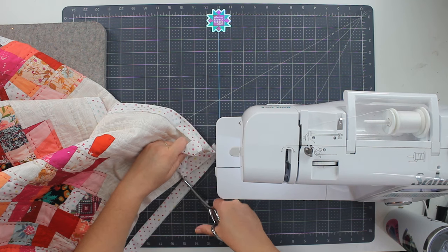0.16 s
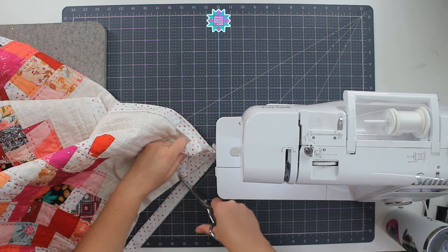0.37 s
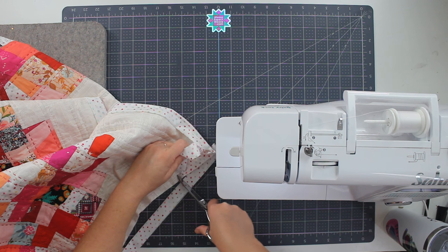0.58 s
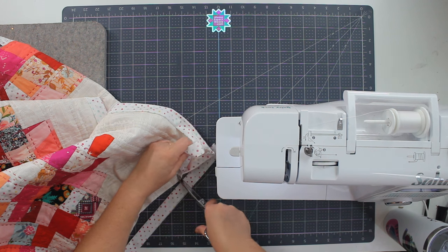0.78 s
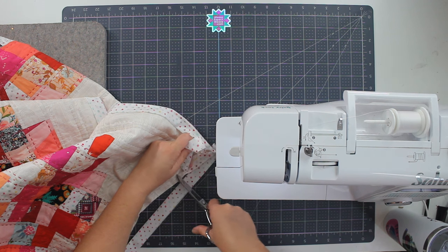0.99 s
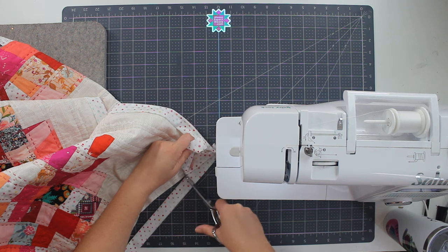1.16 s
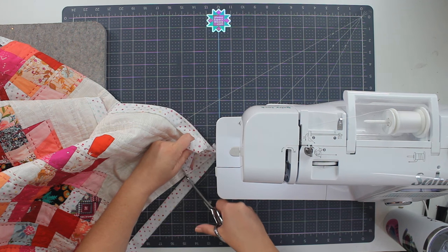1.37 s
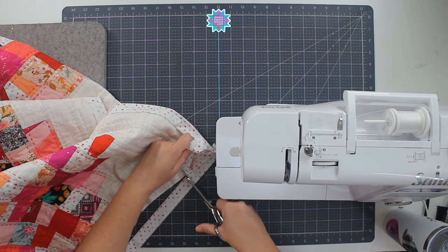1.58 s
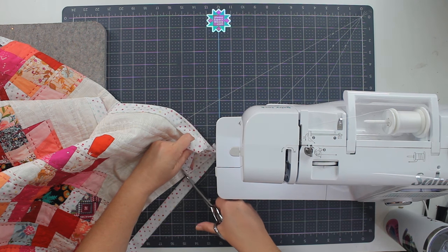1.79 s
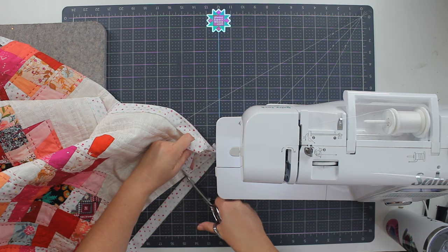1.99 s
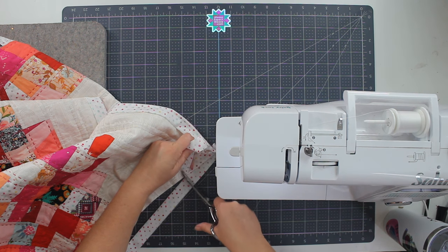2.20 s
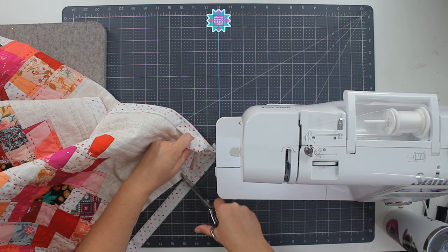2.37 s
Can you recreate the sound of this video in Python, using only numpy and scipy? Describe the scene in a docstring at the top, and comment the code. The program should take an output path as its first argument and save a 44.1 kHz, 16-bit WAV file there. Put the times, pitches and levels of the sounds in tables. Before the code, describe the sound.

Scissors snip a stitch: faint blade rubbing from 0.18 seconds, then a crunch and bright, very short metallic clack at 0.25. A low, dull table thud follows at 0.44, with softer bumps and cloth rustles from 0.6 to 1.0 and a tiny tick at 0.71. Near-quiet until blades scrape thinly open at 1.9, click lightly at 1.97, and faintly rub at 2.25. Small quiet room, close mono, faint hiss and hum.

```python
"""A small quiet room: at a sewing table, large steel scissors snip a stitch in a quilt seam.
Over faint hiss and hum the blades rub (stick-slip noise), the thread parts (a noise burst) and the blades
clack shut (cracks and decaying steel modes). Hands bump the table (table-top modes) and shift the cloth
(grainy noise), a hard point ticks on the mat, then the blades scrape open and click lightly.
It is mono: nearby surfaces add two reflections and a short tail, and no microphone colour is added."""
import sys
import numpy as np
from scipy import signal
from scipy.fft import rfft, irfft, next_fast_len
from scipy.io import wavfile
from scipy.ndimage import map_coordinates

SR = 44100
rng = np.random.default_rng(int(sys.argv[2]) if len(sys.argv) > 2 else 0)


def transcribe(u):
    """Save the signal u as a 16-bit wav file named by the first command-line argument.

    u: samples, shape (n,) or (channels, n), limited to [-1, 1]; the rate is SR.
    q: integer samples, one column per channel.
    """
    v = np.clip(np.atleast_2d(u).T, -1, 1)
    q = np.round(v * 32767).astype(np.int16)
    wavfile.write(sys.argv[1], SR, q)


N = 110250
TIME = np.arange(N) / SR

# colour of the room's steady hiss: pitch_hz, level_db
AIR_COLOUR = [(15, -34), (25, -8), (49, -12), (86, -3), (233, -5.5), (297, -5), (410, -7), (445, -8),
              (804, -8.5), (871, -9), (1140, -10), (1490, -10.5), (2010, -11), (6380, -13.5), (15500, -19)]
AIR_DB = -60.5
HUM_HZ, HUM_DB = 120.5, -80

# decay of the room tail: pitch_hz, t60_s
ROOM_DECAY = [(150, 0.38), (1500, 0.18), (5000, 0.19), (13000, 0.11)]
ROOM_DB, ROOM_DELAY_S = -13.5, 0.003
# reflections from near surfaces: delay_s, level_db
NEAR_SURFACES = [(.0046, -24.5), (.0087, -22.5)]

# cloth sliding over the mat, bell-shaped in time: centre_s, half_length_s, level_db, centre_hz, spread_octaves
CLOTH_RUSTLES = [(0.59, 0.099, -62.5, 2370, 1.8), (0.707, 0.01, -56.5, 2440, 1.37),
                 (0.77, 0.086, -67, 980, 0.85), (0.817, 0.029, -64.5, 12100, 0.75),
                 (0.90, 0.039, -66, 4800, 0.19), (0.90, 0.081, -65.5, 3500, 1.6),
                 (1.005, 0.016, -60.5, 1780, 1.55), (1.83, 0.035, -68.5, 940, 0.45),
                 (2.074, 0.0047, -57.5, 7000, 1.4)]
RUSTLE_GRAIN_DB, FIBRE_HZ = 2.5, 709

# soft blows on the table: start_s, level_db, centre_hz, spread_octaves, scuff_db (relative)
TABLE_BUMPS = [(0.184, -56.5, 140, 1.2, -18), (0.2385, -44.5, 447, 2.9, -2.5),
               (0.4415, -37.5, 136, 0.52, -24), (0.587, -56, 600, 2.1, 4.5), (0.645, -47, 720, 1.1, -8),
               (0.695, -48.5, 230, 0.41, -15), (0.7041, -41, 376, 1.3, -14.5), (0.731, -51, 250, 1.7, -10),
               (0.755, -49.5, 406, 1.1, -6), (1.007, -59.5, 300, 2.1, 3), (1.912, -57, 125, 0.87, -8)]
# modes of the table top: pitch_hz, level_db, t60_s
TABLE_MODES = [(120.5, -4, .21), (198.7, -3, 0.13), (231, 0.5, 0.12), (395, -32, 0.041), (530, -1.5, 0.081),
               (828, -2.5, 0.053), (1135, -7, 0.044)]
BUMP_ATTACK_S, SCUFF_T60_S = 0.002, 0.069

# hard contacts on the mat: start_s, level_db
MAT_TICKS = [(0.7084, -51.5)]
TICK_HZ, TICK_T60_S = 4770, 0.027

# the edges shear the thread: centre_s, level_db
THREAD_CUT = (0.2381, -30.5)
CUT_WIDTH_S = 0.0012
# colour of the shearing crunch: pitch_hz, level_db
SHEAR_COLOUR = [(200, -10), (1100, -6), (2000, -9), (3000, -7.5), (6000, -12), (8000, -11), (10000, -26),
                (11900, 6.5), (12800, -8), (14200, -16), (15500, -2), (16500, -19)]

# blades rubbing past each other: start_s, swell_s, half_t60_s, level_db, pitch_factor, squeak_share
BLADE_SCRAPES = [(0.183, 0.0028, 0.02, -55.5, 0.98, 0), (0.195, 0.0042, 0.012, -48, 0.98, 0),
                 (0.222, 0.02, .03, -44, 1, 0), (1.001, 0.0055, 0.018, -53.5, .97, 0),
                 (1.883, 0.019, .010, -41, 1.0, 0.43), (2.240, 0.0066, .022, -55.5, 1, 0)]
# colour of the rubbing edges: pitch_hz, level_db
EDGE_COLOUR = [(500, -18.5), (2500, -33), (3900, -8), (5900, -17.5), (7200, -9), (9300, -7.5), (10800, -16),
               (12200, 5), (13300, -12), (15600, -11.5)]
SWELL_DB, SLIP_HZ, SLIP_DEPTH = 21.5, 643, 0.78
SQUEAK_HZ, SQUEAK_T60_S = 10010, 0.061

# blade clacks: start_s, ring_db, crack_db, is_open (0 shut, 1 open), ring_length_factor
BLADE_CLACKS = [(0.2497, -7, -21.5, 0, 0.8), (1.9721, -28.5, -40.5, 1, 0.61)]
# steel modes, levels relative to ring_db: shut_hz, shut_db, open_hz, open_db, t60_s (before the length factor)
STEEL_MODES = [(2623, -20.5, 2260, -16.5, 0.029), (3420, -31.5, 2640, -16.5, 0.046),
               (4130, -28, 3360, -20, 0.033), (4544, -28, 4110, -17, 0.12), (5540, -29, 2900, -23, 0.033),
               (6260, -27, 4900, -22, 0.051), (7400, -28.5, 12000, -21, 0.038),
               (10260, -39, 8100, -26, 0.05), (12400, -25, 13000, -19, 0.049), (13400, 8, 12850, 4, 0.0079),
               (13040, -32, 12710, -12, 0.062), (13790, -25, 14440, -27, 0.061)]
RING_ATTACK_S, RING_WAVER_RAD, WAVER_HZ = 0.0011, 0.35, 250
# colour of the contact crack: pitch_hz, level_db
CRACK_COLOUR = [(150, -32), (1100, -14), (2500, -7), (4000, -6), (6500, 2), (8500, -3.5), (11000, 2.5),
                (12400, 11), (13600, 8.5), (14500, 2), (15600, -1.5)]
CRACK_RISE_S = 0.00084
SHIMMER_DB, SHIMMER_T60_S = -14.5, 0.15  # countless weak modes, relative to the crack

LOW_CUT_HZ, TOP_HZ = 56, 16000


def amp(db):
    """Decibels to gain."""
    return 10 ** (np.asarray(db) / 20)


def unit(x):
    """Scale to rms 1."""
    return x / np.sqrt(np.mean(x ** 2) + 1e-20)


def along(points, hz):
    """Read (pitch_hz, value) points on a log pitch axis."""
    point_hz, value = np.transpose(points)
    return np.interp(np.log(hz + 1), np.log(point_hz + 1), value)


def filtered(x, response):
    """Multiply the spectrum of x by a response of frequency."""
    size = next_fast_len(N + SR // 2)  # padded so that delays do not wrap round
    spectrum = rfft(x, size) * response(np.fft.rfftfreq(size, 1 / SR))
    return irfft(spectrum, size)[:N]


def noise(colour, pitch=1):
    """Noise of rms 1 with a (pitch_hz, level_db) colour, shifted by a pitch factor."""
    return unit(filtered(rng.standard_normal(N), lambda hz: amp(along(colour, hz / pitch))))


def bell(hz, centre_hz, octaves):
    """A smooth band on a log pitch axis."""
    return np.exp(-0.5 * (np.log2((hz + 1) / centre_hz) / octaves) ** 2)


def band(centre_hz, octaves):
    """Noise of rms 1 around a centre pitch."""
    return unit(filtered(rng.standard_normal(N), lambda hz: bell(hz, centre_hz, octaves)))


def pulse(centre_s, width_s):
    """A bell-shaped swell and fade in time."""
    return np.exp(-0.5 * ((TIME - centre_s) / width_s) ** 2)


def wobble(rate):
    """A smooth random curve with rate knots a second."""
    return map_coordinates(rng.standard_normal(N // 8), [TIME * rate], mode="wrap")


def since(start_s):
    """Seconds after the start, zero before it."""
    return np.maximum(TIME - start_s, 0)


def fade(t, t60):
    """Exponential decay by 60 dB in t60 seconds."""
    return np.exp(-np.log(1000) * t / t60)


def sine(hz, t, phase=0):
    """A sine with an optional phase in radians."""
    return np.sin(2 * np.pi * hz * t + phase)


def background():
    """Steady coloured hiss and a faint mains hum as one sine."""
    return amp(AIR_DB) * noise(AIR_COLOUR) + amp(HUM_DB) * sine(HUM_HZ, TIME)


def delayed(x, delay_s):
    """Delay by turning the phase, so fractions of a sample are kept."""
    return filtered(x, lambda hz: np.exp(-2j * np.pi * hz * delay_s))


def room(x):
    """Two near reflections and a short noise tail whose decay time depends on pitch."""
    hz, t, bins = signal.stft(rng.standard_normal(SR // 2), SR, nperseg=256)
    decaying = bins * fade(t, along(ROOM_DECAY, hz)[:, None])
    tail = signal.istft(decaying, SR, nperseg=256)[1]
    late = signal.fftconvolve(x, tail / np.linalg.norm(tail))[:N]
    early = sum(amp(db) * delayed(x, delay_s) for delay_s, db in NEAR_SURFACES)
    return amp(ROOM_DB) * delayed(late, ROOM_DELAY_S) + early


def cloth():
    """Soft swishes of the quilt: bands of noise made grainy by a rapid random level."""
    out = np.zeros(N)
    for centre_s, half_s, db, hz, octaves in CLOTH_RUSTLES:
        grainy = unit(band(hz, octaves) * amp(RUSTLE_GRAIN_DB * wobble(FIBRE_HZ)))
        out += amp(db) * pulse(centre_s, half_s) * grainy
    return out


def bumps():
    """Each padded blow rings the table modes near its own pitch, with a scuff of cloth."""
    out = np.zeros(N)
    for start_s, db, centre_hz, octaves, scuff_db in TABLE_BUMPS:
        t = since(start_s)
        ring = np.zeros(N)
        for hz, mode_db, t60 in TABLE_MODES:
            ring += amp(mode_db) * bell(hz, centre_hz, octaves) * fade(t, t60) * sine(hz, t)
        scuff = amp(scuff_db) * fade(t, SCUFF_T60_S) * band(centre_hz, octaves / 2)
        attack = 1 - np.exp(-t / BUMP_ATTACK_S)
        out += amp(db) * attack * (scuff - ring)
    return out


def ticks():
    """A hard point touches the mat: narrow noise starts at once and dies away."""
    out = np.zeros(N)
    for start_s, db in MAT_TICKS:
        decay = (TIME > start_s) * fade(since(start_s), TICK_T60_S)
        out += amp(db) * decay * band(TICK_HZ, octaves=0.2)
    return out


def cut():
    """A brief crunch of coloured noise as the edges shear the thread."""
    centre_s, db = THREAD_CUT
    return amp(db) * pulse(centre_s, CUT_WIDTH_S) * noise(SHEAR_COLOUR)


def scrapes():
    """The edges stick and slip, swelling until they let go; a hard rub leaves a thin squeak."""
    out = np.zeros(N)
    for start_s, swell_s, half_t60_s, db, pitch, squeak in BLADE_SCRAPES:
        climb = np.clip((TIME - start_s) / swell_s - 1, -1, 0)  # -1 at the start, 0 at full level
        swell = (TIME > start_s) * amp(SWELL_DB * climb)
        after = since(start_s + swell_s)
        slips = 1 + SLIP_DEPTH * sine(SLIP_HZ, TIME, 2 * wobble(200))
        rub = slips * fade(after, 2 * half_t60_s) * noise(EDGE_COLOUR, pitch)
        tone = squeak * swell * fade(after, SQUEAK_T60_S) * sine(SQUEAK_HZ, TIME)
        out += amp(db) * swell * (rub + tone)
    return out


def clacks():
    """Steel meets steel: a short crack, a shimmer and the rough ring of blades that press on each other."""
    out = np.zeros(N)
    for start_s, ring_db, crack_db, is_open, length in BLADE_CLACKS:
        t = since(start_s)
        attack = 1 - np.exp(-(t / RING_ATTACK_S) ** 2)
        for shut_hz, shut_db, open_hz, open_db, t60 in STEEL_MODES:
            hz, mode_db = (open_hz, open_db) if is_open > 0.5 else (shut_hz, shut_db)
            tone = sine(hz, t, RING_WAVER_RAD * wobble(WAVER_HZ))  # an unsteady phase roughens it
            out += amp(ring_db + mode_db) * tone * fade(t, t60 * length) * attack
        rise = t / CRACK_RISE_S
        crack = rise * np.exp(1 - rise)  # peaks at 1 after CRACK_RISE_S
        shimmer = amp(SHIMMER_DB) * (1 - np.exp(-rise)) * fade(t, SHIMMER_T60_S)
        out += amp(crack_db) * (crack + shimmer) * noise(CRACK_COLOUR)
    return out


def scene():
    """Scissors, table and cloth in the room, alike in both channels; they radiate little deep bass."""
    direct = clacks() + scrapes() + cut() + bumps() + ticks() + cloth()
    low_cut = signal.butter(2, LOW_CUT_HZ, "high", fs=SR, output="sos")
    direct = signal.sosfilt(low_cut, direct)
    mono = direct + room(direct) + background()
    return np.array([mono, mono])


def record(dry):
    """Nothing is kept above the band limit."""
    return np.array([filtered(channel, lambda hz: hz < TOP_HZ) for channel in dry])


dry = scene()
out = record(dry)
transcribe(out)
```